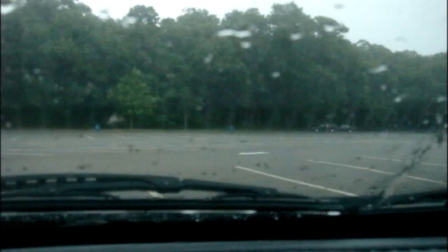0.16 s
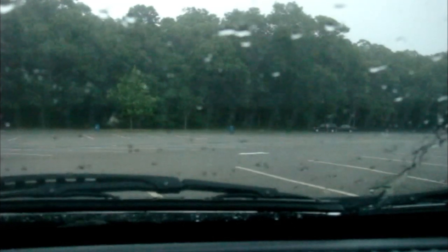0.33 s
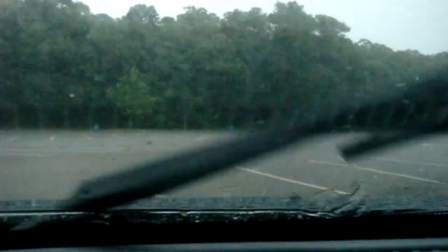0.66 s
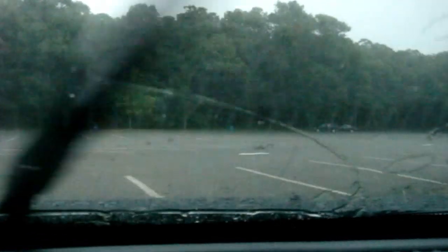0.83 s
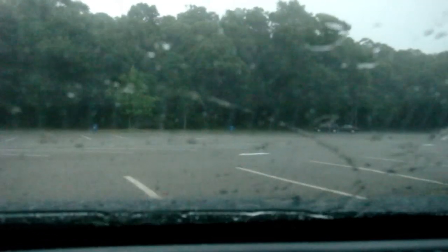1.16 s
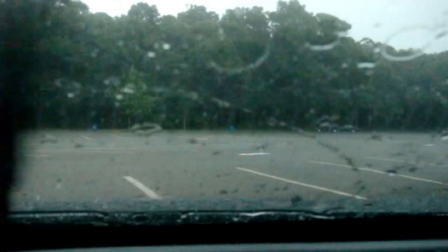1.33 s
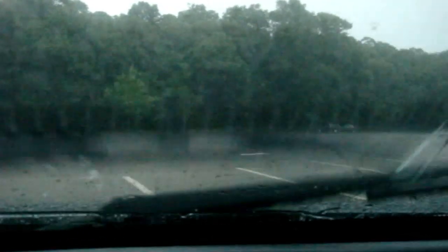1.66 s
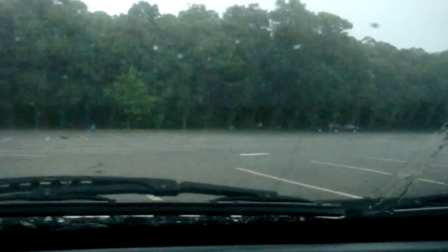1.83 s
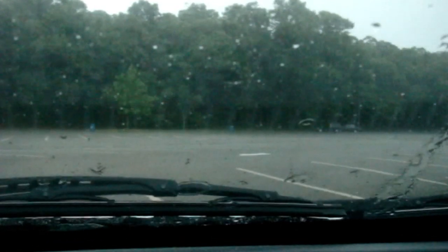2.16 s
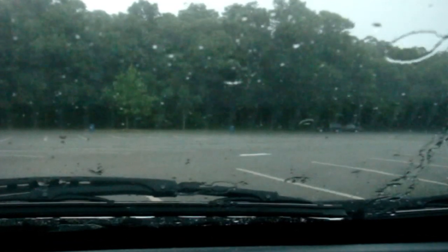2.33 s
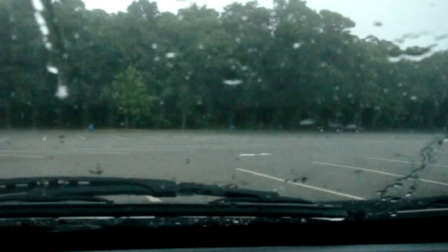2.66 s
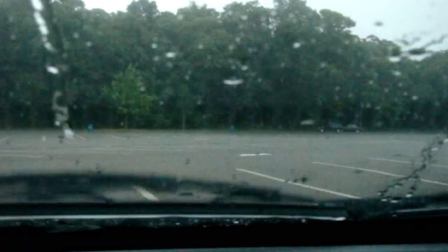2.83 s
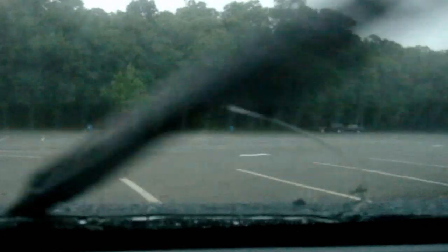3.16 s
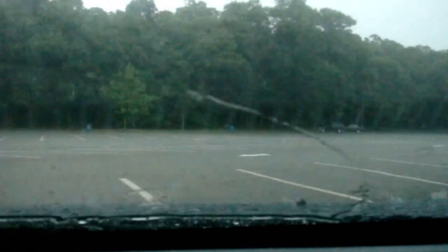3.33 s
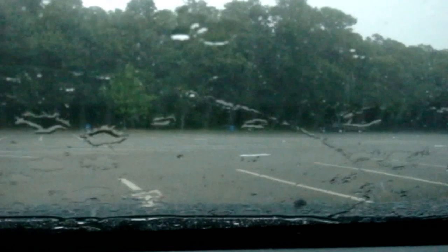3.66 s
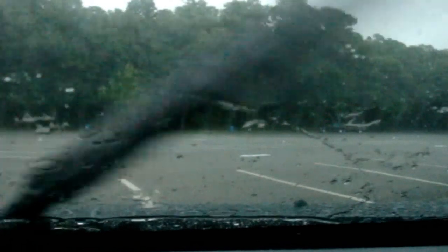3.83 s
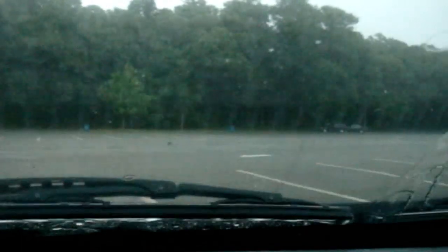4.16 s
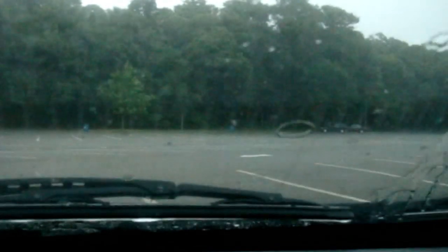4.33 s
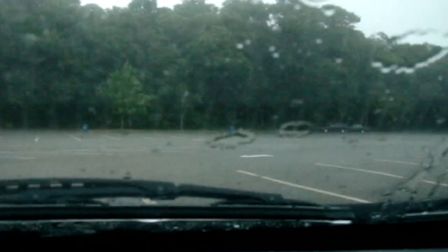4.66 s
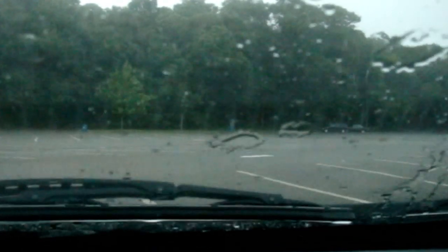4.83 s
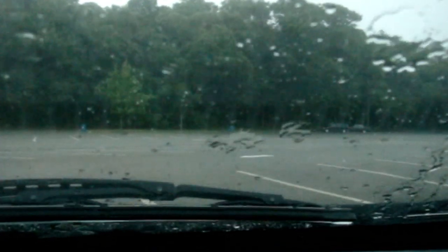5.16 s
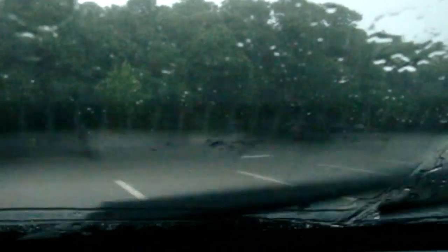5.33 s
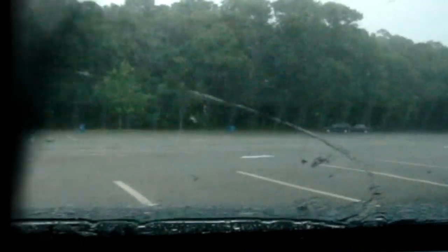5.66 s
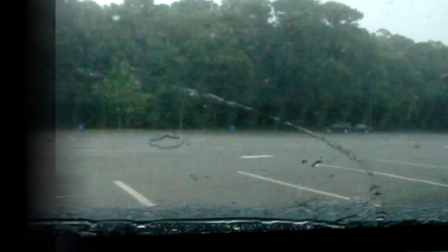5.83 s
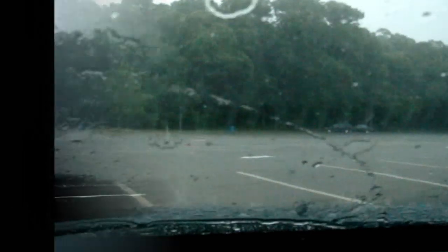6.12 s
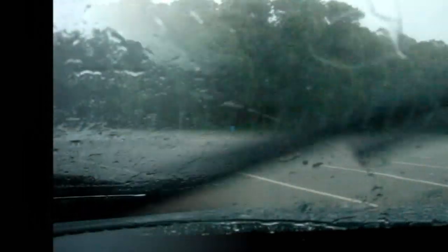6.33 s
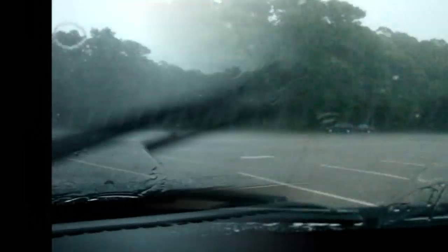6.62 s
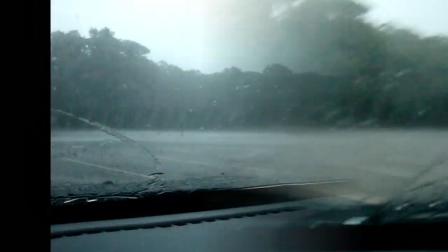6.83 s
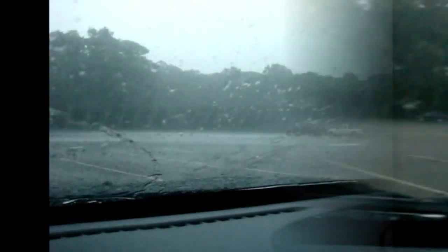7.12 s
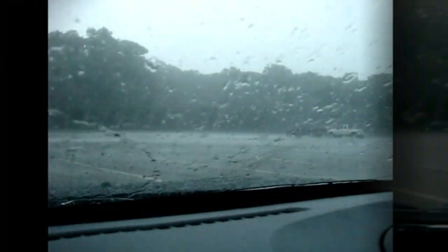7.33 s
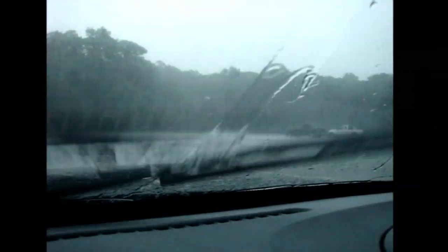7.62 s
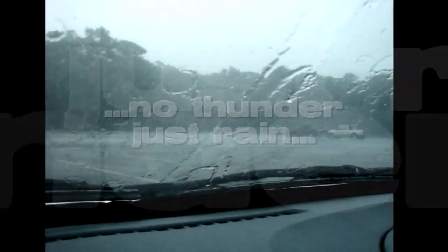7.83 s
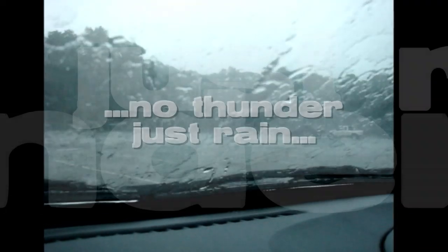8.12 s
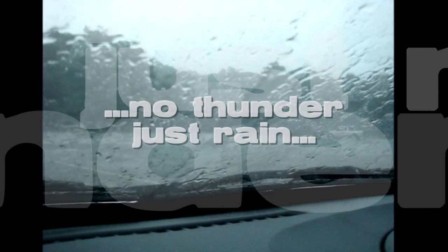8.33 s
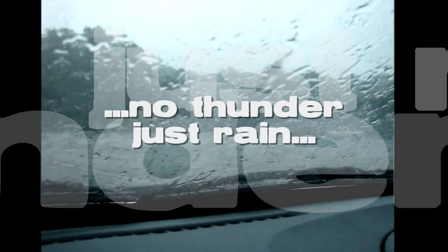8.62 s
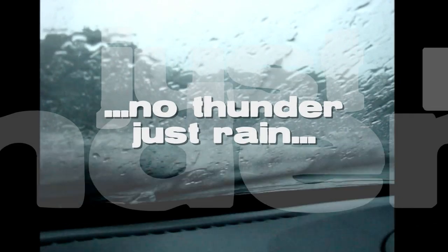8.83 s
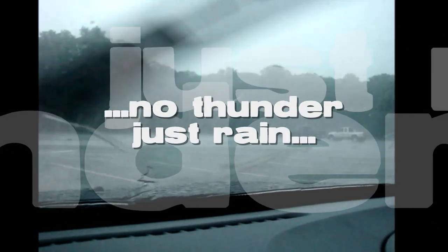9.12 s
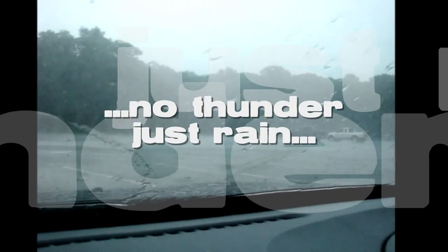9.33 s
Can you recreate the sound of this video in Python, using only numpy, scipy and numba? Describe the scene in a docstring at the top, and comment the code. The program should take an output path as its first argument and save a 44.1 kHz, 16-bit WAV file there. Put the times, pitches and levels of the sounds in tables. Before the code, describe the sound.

Close, enclosed cabin sound: coarse drops tick crisply on the glass at first, over muffled roof drumming and faint low hum. The wipers sweep intermittently, giving dull thumps, a sharp slap and one brief thin motor whine. Rain keeps coming in short waves with splashes and plops. It quietens past the middle, then a dense downpour roars over roof and glass before gradually thinning out.

```python
"""Heavy rain drums on the roof of a parked car and patters on its windscreen, heard from the front seat.
It comes in sheets, the heaviest near the end; big drops snap, plop and splash, wipers thud, knock and whine.
Rain is made of many short blows, each with a click and a ring, shaped by the sound of the panel it hits.
Splashes are bursts of such blows. Hiss, rumble and thuds are filtered noise; whine, pings and a faint hum
are sine waves."""
import sys
import numpy as np
from scipy import signal
from scipy.fft import rfft, irfft
from scipy.io import wavfile
from numba import njit

SR = 44100
rng = np.random.default_rng(int(sys.argv[2]) if len(sys.argv) > 2 else 0)


def store_pcm(level_fs):
    """Save levels as 16-bit WAV."""
    pcm = np.round(np.clip(level_fs, -1, 1) * 32767).astype(np.int16)
    wavfile.write(sys.argv[1], SR, np.atleast_2d(pcm).T)


N = 418489  # length of the scene in samples, about 9.5 s

# Loudness of the cabin hum. Each row: time in seconds, level in dB to which its tones are referred.
HUM_LEVEL = [(0, -61.5), (1.6, -57.5), (2.5, -62), (3.2, -58.5), (4.6, -58.5), (6.1, -66), (6.35, -74),
             (6.9, -83), (7.6, -63), (9.49, -73)]
# Tones in the hum. Each row: pitch in Hz, level in dB compared with the hum's loudness.
HUM_LINES = [(57.3, 1), (86, -7.5)]
# Tone of the rumbling body shell. Each row: frequency in Hz, relative level in dB.
SHELL_TONE = [(20, -16), (40, -5), (60, -8), (90, 0.5), (130, 2.5), (190, 12), (260, 8.5), (600, -43)]
# Loudness of that rumble. Each row: time in seconds, level in dB.
RUMBLE_LEVEL = [(0, -47.5), (6.1, -46.5), (6.35, -52), (6.95, -52.5), (7.3, -47), (8.9, -46), (9.49, -42.5)]
# Tone of the rain hissing all around the car. Each row: frequency in Hz, relative level in dB.
OUTSIDE_TONE = [(100, -24), (300, 10), (700, 12), (1700, 6), (2600, -2), (4500, 8.5), (6000, -15),
                (10000, -11.5)]
# Loudness of that hiss. Each row: time in seconds, level in dB.
OUTSIDE_LEVEL = [(0, -38.5), (2, -43.5), (2.9, -43.5), (5.3, -41.5), (6.3, -42.5), (9.49, -41)]

# Whine of the wiper motor in one sweep: time of greatest load and half the width of the load peak, in seconds
SWEEP_S, SWEEP_HALF_S = 0.99, 0.087
# its free-running pitch, the drop in pitch at full load, and its level at full load
MOTOR_HZ, MOTOR_SAG_HZ, MOTOR_DB = 1480, 66, -40
# Wiper arms starting, turning and parking. Each row: start in seconds, level in dB, length in seconds,
# frequency in Hz below which the thud is thin.
THUDS = [(0.528, -34, 0.15, 50), (1.267, -25.5, 0.058, 130), (1.862, -28.5, 0.062, 130),
         (2.937, -30.5, 0.11, 130), (3.649, -28, 0.049, 125), (3.741, -26.5, 0.059, 70),
         (4.236, -31, 0.071, 90), (5.314, -28, 0.15, 85), (6.056, -32.5, 0.048, 110),
         (7.185, -27, 0.048, 200), (8.856, -28, 0.05, 69.8)]
# Tone of the wiper linkage in the bulkhead. Each row: frequency in Hz, relative level in dB.
BULKHEAD_TONE = [(35, -20), (70, -11), (110, -7.5), (190, 4.5), (320, 3.5), (480, 1.5), (900, -2.5),
                 (1500, -13.5), (3000, -40)]
# Slack in the wiper linkage knocking home. Each row: start in seconds, peak level in dB.
BUMPS = [(0.549, -16), (1.272, -17), (2.94, -22), (2.96, -15.5), (3.667, -19), (3.68, -17), (3.728, -14),
         (3.763, -15), (4.283, -17), (5.322, -18), (5.363, -18), (7.193, -23), (8.878, -17), (8.893, -21.5)]
# Tone of such a bump. Each row: frequency in Hz, relative level in dB.
BUMP_TONE = [(30, -22), (70, -17.5), (130, -0.5), (250, 2), (450, -3), (800, -6), (1500, -19), (4000, -67)]
# Wiper blades flipping over. Each row: time in seconds, peak of the bare slap in dB, pitch of the slap in Hz.
KNOCKS = [(1.3097, -4.2, 740), (7.2263, -7.4, 780)]
# Ringing of windscreen and cabin after a flip. Each row: pitch in Hz, level in dB compared with the slap,
# time to fade by 60 dB in seconds.
KNOCK_MODES = [(197, -18, 0.14), (398, -12.5, 0.076), (570, -6, 0.029), (716, -19, 0.044),
               (860, -15.5, 0.067), (1130, -24, 0.057), (2200, -25, 0.031)]

# A run of drips on a piece of trim: start in seconds, level in dB, length in seconds.
RATTLE = (4.35, -31.5, 0.19)
# Tone of that trim. Each row: frequency in Hz, relative level in dB.
TRIM_TONE = [(1000, -35), (2000, -13), (2350, 2), (2900, -3), (3400, -9), (8000, -39)]
# Drops that ring a piece of trim. Each row: start in seconds, pitch in Hz, level at the start in dB.
PINGS = [(0.107, 2630, -15.5), (0.3323, 2425, -10), (0.336, 3000, -10), (4.664, 2980, -11),
         (6.756, 4350, -17.5)]
# Drops bursting into droplets. Each row: start in seconds, level in dB before the cabin colours it,
# length in seconds, frequency in Hz above which the splash is dull.
SPLASHES = [(0.147, -28.5, 0.014, 10000), (.607, -29.5, 0.052, 10000), (0.686, -28, 0.039, 2000),
            (1.206, -34, 0.022, 2000), (1.636, -28, 0.0082, 9000), (1.724, -30, 0.052, 7000),
            (2.241, -27.5, 0.0058, 5000), (2.35, -27.5, 0.012, 5000), (2.401, -24.5, 0.0099, 10000),
            (2.528, -30, .012, 5000), (2.73, -35, 0.019, 2200), (2.832, -33, 0.018, 4000),
            (3.125, -29.5, 0.0065, 8000), (3.236, -31, .02, 4000), (3.408, -29, 0.016, 5000),
            (3.479, -29, 0.033, 6000), (3.614, -29.5, 0.027, 7000), (3.715, -29.5, 0.035, 4000),
            (3.95, -32, 0.053, 6000), (4.238, -28.5, 0.047, 3000), (4.395, -37, 0.011, 7000),
            (4.846, -31, 0.014, 5000), (4.958, -24.5, 0.016, 2420), (5.285, -37, 0.043, 2000),
            (5.306, -33, .014, 4000), (5.453, -29.5, 0.032, 4000), (5.81, -29, 0.074, 6000),
            (5.997, -25, .012, 6000), (6.05, -27, 0.013, 5000), (6.428, -29, 0.01, 10000),
            (7.372, -29, 0.031, 5030), (9.129, -32, 0.016, 9940), (9.333, -22.5, 0.015, 10000)]
# Tone of a splash on the glass. Each row: frequency in Hz, relative level in dB.
SPLASH_TONE = [(200, -32), (1000, 3), (3000, 1), (5000, -1.5), (9500, -6)]
# Fat drops plopping on the roof. Each row: start in seconds, peak in dB before the cabin colours it,
# frequency in Hz below which the plop is thin.
PLOPS = [(.302, -14, 450), (.683, -14, 350), (.702, -14.5, 400), (2.738, -19.5, 300), (2.752, -21, 300),
         (3.415, -18, 400), (3.596, -18, 550), (4.002, -25, 300), (4.279, -17, 400), (4.88, -32, 450),
         (4.966, -11, 650), (5.02, -20, 450), (6.06, -21, 300), (6.432, -29, 400), (8.05, -9, 450)]
# Tone of a plop. Each row: frequency in Hz, relative level in dB.
PLOP_TONE = [(80, -75), (200, -16), (400, 12), (650, 13), (1050, 1.5), (1600, -5.5), (2600, -5),
             (5000, -40), (10000, -39)]
# Big drops snapping on the windscreen. Each row: start in seconds, peak in dB before the cabin colours it,
# frequency in Hz above which the snap is dull.
SNAPS = [(.0225, -9.5, 9000), (.179, -13, 4970), (.228, -11, 8000), (.262, -14, 8000), (.3005, -14.5, 4970),
         (.3332, -10, 3560), (.364, -10.5, 2500), (.4467, -12, 9000), (.464, -7.5, 6000),
         (.5085, -12, 7030), (.5204, -22, 6000), (.546, -13, 6960), (.6067, -14, 9000),
         (.6462, -10.5, 9000), (.7705, -10, 9100), (.915, -16, 9000), (.9725, -14, 9000),
         (1.4985, -14, 9000), (1.5135, -12, 8000), (1.6863, -11, 10000), (1.697, -10, 10000),
         (2.171, -25, 9000), (2.2435, -20, 5000), (2.2988, -17, 9000), (2.363, -18, 5000),
         (2.409, -9, 10000), (2.433, -21, 8000), (2.447, -29, 8000), (2.485, -16, 7000), (2.554, -20, 5000),
         (2.707, -14, 10000), (2.8076, -15, 8000), (3.1265, -14.5, 9000), (3.2843, -16, 6940),
         (3.3045, -17, 4970), (3.9588, -13.5, 7000), (4.122, -13.5, 6000), (4.1849, -11, 9000),
         (4.2265, -10, 9000), (4.3818, -21, 7000), (4.475, -13, 7000), (4.559, -15, 8000),
         (4.6631, -16, 6000), (4.682, -19, 7000), (4.799, -14, 7000), (5.176, -22, 7000),
         (5.224, -18, 5000), (6.145, -25, 8000), (9.211, -21, 6000)]

# Sheets of rain. Each row: start in seconds, rise in seconds, time from start to fading in seconds,
# level on the roof in dB, level on the glass in dB, speed of fading in dB per second.
SHEETS = [(-.06, .2, .36, -37, -37.5, 15), (.42, .14, .27, -28, -30, 110), (.72, .13, .24, -29, -29.5, 9),
          (1.4, .33, .46, -29, -30, 55), (2.29, .1, .22, -32, -33, 110), (3.15, .28, .62, -31, -34, 32),
          (3.91, .07, .11, -30, -35, 70), (4.08, .32, .48, -32, -31.5, 23), (4.74, .12, .3, -32, -38, 80),
          (5.25, .2, .26, -32, -40, 50), (5.36, .36, .74, -28.5, -30, 90), (6.1, .08, .2, -39, -41, 20),
          (6.65, .3, .72, -33.5, -35.5, 2), (7.43, .27, .42, -19, -17.5, 22),
          (7.8, .25, .27, -24, -25.5, 16), (8.3, .22, .5, -33, -44, 25)]
STEADY_ROOF_DB, STEADY_GLASS_DB = -36.5, -43  # rain between the sheets
FLURRY_HZ, FLURRY_DB = 18, 1.25  # drops come in clumps: how fast, and how uneven in light rain
DOWNPOUR_DB = -25  # around this level and above, the clumps merge
# Tone of the roof under rain. Each row: frequency in Hz, relative level in dB.
ROOF_TONE = [(40, -45), (80, -26), (120, -30), (160, -15.5), (200, -11.5), (250, -7.5), (400, -1.5),
             (520, -3), (660, 0.5), (800, -4), (1000, -4), (1300, -8.5), (1700, -14), (3000, -13),
             (10000, -59.5)]
# Tone of the windscreen under drops. Each row: frequency in Hz, relative level in dB.
GLASS_TONE = [(90, -49), (200, -19.5), (500, -9.5), (1000, -1), (1700, -5), (2100, -2), (2550, -2),
              (3400, -4.5), (4600, -4), (5600, -6.5), (7500, -8.5), (9000, -10), (10200, -19)]
# Mix of drops on the glass. Each row: time in seconds, coarse drops compared with the fine spray in dB,
# change to the treble of the spray in dB.
COARSE = [(0, 19, 9.5), (1.8, -3, -8.5), (2.4, 0.5, -18), (3.0, 2, 3.5), (4.4, 6, -8.5), (5.8, -1.5, -21),
          (6.6, -7, 0.5), (7.7, -15, -4), (8.15, -16, -8.5), (9.49, -9, -20.5)]
SPRAY_TOP_HZ = 4970  # where the treble of the fine spray begins
# Resonances of roof and cabin. Each row: frequency in Hz, width in Hz, lift in dB.
CABIN_PEAKS = [(202.5, 10, 5.5), (430, 7.4, 5), (528, 20, 3), (690, 20, 1), (880, 44, 2), (1326, 20, 1.5),
               (1744, 25, 3), (2590, 32, 2), (4290, 130, 1), (5190, 64, -0.5)]
TOP_HZ = 10050  # upper edge of the whole sound


def undb(db):
    """Decibels to gain."""
    return 10 ** (np.asarray(db) / 20)


def unit(x):
    """Scale to an average strength (rms) of 1."""
    return x / np.sqrt(np.mean(x ** 2) + 1e-18)


def curve(table, axis=1):
    """One column of a table, joined by straight lines in time."""
    rows = np.array(table)
    return np.interp(np.arange(N) / SR, rows[:, 0], rows[:, axis])


def add(out, s, sound):
    """Mix a sound in at time s."""
    i = max(int(s * SR), 0)
    out[i:i + len(sound)] += sound[:max(N - i, 0)]


def cut(x, hz, kind, order=2):
    """Gentle filter that keeps the lows ("low") or the highs ("high")."""
    return signal.sosfilt(signal.butter(order, min(hz, SR / 3), kind, fs=SR, output="sos"), x)


def fading(t, t60):
    """Ringing dies away by 60 dB, to a thousandth, in t60 seconds."""
    return np.exp(-np.log(1000) * t / t60)


def swell(db, length):
    """An envelope that rises quickly and dies away."""
    u = np.arange(SR // 2) / SR / length * np.pi
    return undb(db) * u * np.exp(1 - u)


def response(points, size=4096):
    """The sound of one tap on something with this tone: it starts at once and then dies away."""
    hz, db = np.transpose(points)
    grid = np.maximum(np.fft.rfftfreq(size, 1 / SR), 1)
    tone_db = np.interp(np.log(grid), np.log(hz), db)
    cepstrum = irfft(np.log(undb(tone_db)))
    # folding the second half onto the first packs the energy at the start (minimum phase)
    cepstrum[1:size // 2] *= 2
    cepstrum[size // 2 + 1:] = 0
    return irfft(np.exp(rfft(cepstrum)))


def toned_noise(points):
    """Steady noise with a given tone; rms 1."""
    return unit(signal.oaconvolve(rng.standard_normal(N), response(points))[:N])


def spots(ring_db, t60, tint_db, count, size=2048):
    """Blows on different spots: a direct click, a diffuse ring of panel and cabin, and each spot's own colour."""
    t = np.arange(size) / SR
    chance = rng.standard_normal((count, 2, size))
    ring = chance[:, 0] * fading(t, t60)
    blows = undb(ring_db) * ring / np.linalg.norm(ring, axis=1, keepdims=True)
    blows[:, 32] += 1  # the click
    # peaks and dips about half an octave wide
    octave = np.log2(1 + np.fft.rfftfreq(size, 1 / SR) / 500)
    wiggle = np.array([np.interp(2 * octave, np.arange(size), c) for c in chance[:, 1]])
    tint = undb(tint_db * wiggle)
    tint /= np.sqrt(np.mean(tint[:, :size // 4] ** 2, axis=1, keepdims=True))
    return irfft(rfft(blows) * tint)


@njit
def scatter(at, size, spot, blows):
    """Sum of drops, each with the blow of the spot that it hits."""
    out = np.zeros(N + blows.shape[1])
    for k in range(len(at)):
        blow, part = blows[spot[k]], out[at[k]:]
        for i in range(len(blow)):
            part[i] += size[k] * blow[i]
    return out[:N]


def shower(panel, rate, spread_db, ring_db, t60, tint_db, count=200):
    """Drops land at random times and places on a panel, their sizes spread by spread_db; rms 1."""
    rate = rate * np.ones(N)  # drops per second
    fallen = np.cumsum(rate) / SR
    blows = spots(ring_db, t60, tint_db, count=count)
    when, rank, place = rng.random((N // 8, 3))[:int(fallen[-1])].T
    at = np.searchsorted(fallen, when * fallen[-1])
    # many small drops and few large ones, up to a largest size; every other blow is flipped
    flip = (-1) ** np.arange(len(at))
    size = undb(-spread_db * np.log(rank + np.exp(-np.pi))) * flip
    patter = scatter(at, size, (place * count).astype(int), blows)
    # more drops sound denser here, not louder: the level is set elsewhere
    return unit(signal.oaconvolve(patter, panel)[:N] / np.sqrt(rate))


def hum(width_hz=5, waver=0.3):
    """A low hum: steady tones whose strength and phase drift slowly at random."""
    out = 0
    for hz, db in HUM_LINES:
        slow = unit(cut(rng.standard_normal((2, N)), width_hz, "low"))
        phase = 2 * np.pi * hz * np.arange(N) / SR
        tone = (1 + waver * slow[0]) * np.sin(phase) + waver * slow[1] * np.cos(phase)
        out = out + undb(db) * unit(tone)
    return out * undb(curve(HUM_LEVEL))


def shell():
    """The heavy body rumbles softly under the rain."""
    return toned_noise(SHELL_TONE) * undb(curve(RUMBLE_LEVEL))


def outside():
    """Countless drops further off merge into an even hiss."""
    return toned_noise(OUTSIDE_TONE) * undb(curve(OUTSIDE_LEVEL))


def wiper_motor():
    """A thin gear whine that swells and sags in pitch as the blades drag in mid-sweep."""
    load = np.exp(-((np.arange(N) / SR - SWEEP_S) / SWEEP_HALF_S) ** 2)
    phase = 2 * np.pi * np.cumsum(MOTOR_HZ - MOTOR_SAG_HZ * load) / SR
    return np.sqrt(2) * np.sin(phase) * load * undb(MOTOR_DB)


def wiper_thuds():
    """The linkage takes up its load and shudders in the bulkhead."""
    out, wall = np.zeros(N), response(BULKHEAD_TONE)
    for s, db, length, low_hz in THUDS:
        noise = signal.fftconvolve(rng.standard_normal(SR), wall)
        shudder = cut(noise, low_hz, "high")[SR // 2:SR // 2 * 2]
        load = swell(db, length)
        thud = load * shudder
        add(out, s, thud * np.linalg.norm(load) / np.linalg.norm(thud))
    return out


def wiper_bumps(ring_db=0, t60=0.024):
    """Slack in the linkage closes with one broad, dull knock."""
    out, wall = np.zeros(N), response(BUMP_TONE)
    blows = spots(ring_db, t60, 1.5, count=len(BUMPS))
    for (s, db), blow in zip(BUMPS, blows):
        hit = signal.fftconvolve(blow, wall)
        add(out, s, undb(db) * hit / np.abs(hit).max())
    return out


def wiper_knocks(low_hz=200, click_db=-22, click_hz=2200, click_t60=0.013):
    """A rubber blade slaps the glass in one push and pull; its holder clicks, glass and cabin ring briefly."""
    out, t = np.zeros(N), np.arange(SR // 4) / SR
    for s, db, slap_hz in KNOCKS:
        u = 2 * np.pi * slap_hz * np.arange(-64, 65) / SR
        slap = -u * np.exp((1 - u ** 2) / 2)
        ring = np.zeros(len(t))
        for hz, mode_db, t60 in KNOCK_MODES:
            ring += undb(mode_db) * np.sin(2 * np.pi * (hz * t + rng.random())) * fading(t, t60)
        noise = cut(cut(rng.standard_normal(len(t)), click_hz, "high"), click_hz, "low")
        click = noise * fading(t, click_t60)
        add(out, s - len(slap) / 2 / SR, undb(db) * slap)
        add(out, s, undb(db) * (ring + undb(click_db) * click / np.abs(click).max()))
    return cut(out, low_hz, "high", order=1)


def rattle():
    """Drips fall in quick succession on a stiff piece of trim."""
    flow, (s, db, length) = np.zeros(N), RATTLE
    add(flow, s, swell(db, length))
    return flow * shower(response(TRIM_TONE), 400, spread_db=2, ring_db=5, t60=.03, tint_db=2)


def pings(t60=0.0047):
    """A small stiff part rings for a few cycles."""
    out, t = np.zeros(N), np.arange(SR // 10) / SR
    for s, hz, db in PINGS:
        add(out, s, undb(db) * np.sin(2 * np.pi * hz * t) * fading(t, t60))
    return out


def splashes():
    """A drop bursts and its droplets rattle down together; the place where it lands takes off some treble."""
    out = np.zeros(N)
    droplets = shower(response(SPLASH_TONE), 3000, spread_db=3, ring_db=2, t60=.02, tint_db=3)
    droplets = np.tile(droplets, 2)  # so that a late splash does not run out of droplets
    for s, db, length, hz in SPLASHES:
        flow, i = swell(db, length), int(s * SR)
        add(out, s, flow * unit(cut(droplets[i:i + len(flow)], hz, "low")))
    return out


def big_drops(table, tone, kind, ring_db, t60):
    """Single heavy drops, each on its own spot, which takes off its top or its bottom."""
    out, panel = np.zeros(N), response(tone)
    blows = spots(ring_db, t60, 2.5, count=len(table))
    for (s, db, hz), blow in zip(table, blows):
        hit = cut(signal.fftconvolve(blow, panel), hz, kind)[32:]  # start at the click
        add(out, s, undb(db) * hit / np.abs(hit).max())
    return out


def rainfall():
    """Levels on roof and glass in dB: each sheet builds, holds and fades over steady rain, with clumps of drops."""
    power = undb([[STEADY_ROOF_DB], [STEADY_GLASS_DB]]) ** 2
    for start, rise, length, roof_db, glass_db, fade in SHEETS:
        age = np.arange(N) / SR - start
        build = np.sin(np.pi / 2 * np.clip(age / rise, 0, 1)) ** 2
        sheet = build * undb(-fade * np.maximum(age - length, 0))
        power = power + (undb([[roof_db], [glass_db]]) * sheet) ** 2
    clumps = unit(cut(rng.standard_normal(N), FLURRY_HZ, "low"))
    evenness = np.sqrt(1 + power / undb(DOWNPOUR_DB) ** 2)  # heavy rain is smoother
    return 10 * np.log10(power) + FLURRY_DB * clumps / evenness


def windscreen(glass_db):
    """Coarse drops tick on the glass over a fine spray; heavier rain means more coarse drops."""
    panel, share = response(GLASS_TONE), undb(curve(COARSE))
    rate = 220 * undb(np.clip(glass_db - np.median(glass_db), -20, 20) * .5)
    coarse = shower(panel, rate, spread_db=3, ring_db=4.5, t60=.028, tint_db=5.5)
    spray = shower(panel, 3200, spread_db=4.0, ring_db=13, t60=0.027, tint_db=5.0)
    dull = cut(spray, SPRAY_TOP_HZ, "low", order=1)
    treble = spray - dull
    spray = unit(dull + undb(curve(COARSE, axis=2)) * treble)
    return (share * coarse + spray) / np.sqrt(1 + share ** 2) * undb(glass_db)


def roof(roof_db):
    """Dull drumming of equal drops through the headliner; heavier rain means more drops."""
    rate = 700 * undb(np.clip(roof_db - np.median(roof_db), -10, 10))
    drumming = shower(response(ROOF_TONE), rate, spread_db=0.0, ring_db=8.5, t60=0.094, tint_db=2.5)
    return drumming * undb(roof_db)


def cabin(x):
    """A few resonances of roof and cabin colour the rain and drops."""
    out = x
    for hz, width, db in CABIN_PEAKS:
        out = out + (undb(db) - 1) * signal.lfilter(*signal.iirpeak(hz, hz / width, fs=SR), x)
    return out


def scene():
    """Rain and drops coloured by the cabin, then pings, wipers and hum."""
    roof_db, glass_db = rainfall()
    rain = roof(roof_db) + windscreen(glass_db) + outside() + shell()
    snaps = big_drops(SNAPS, GLASS_TONE, "low", ring_db=4, t60=.03)
    plops = big_drops(PLOPS, PLOP_TONE, "high", ring_db=0.0, t60=0.12)
    wipers = wiper_thuds() + wiper_bumps() + wiper_knocks() + wiper_motor()
    coloured = cabin(rain + snaps + plops + splashes() + rattle())
    return (coloured + pings() + wipers + hum())[None]


def record(dry):
    """A steep filter takes away the highest treble."""
    return signal.sosfilt(signal.ellip(10, .2, 80, TOP_HZ, fs=SR, output="sos"), dry)


dry = scene()
out = record(dry)
store_pcm(out)
```